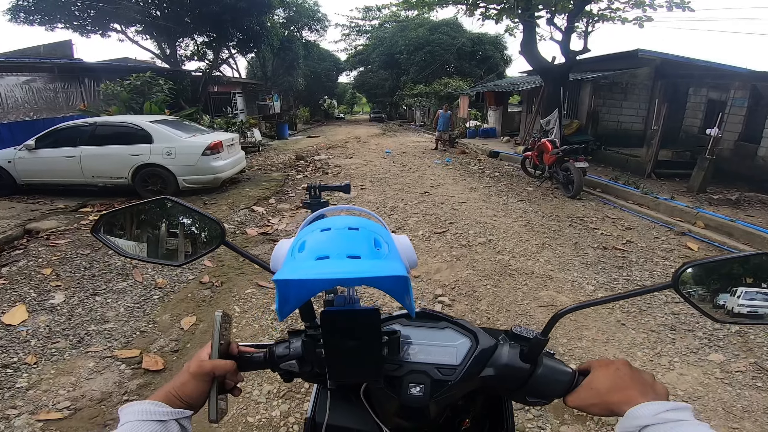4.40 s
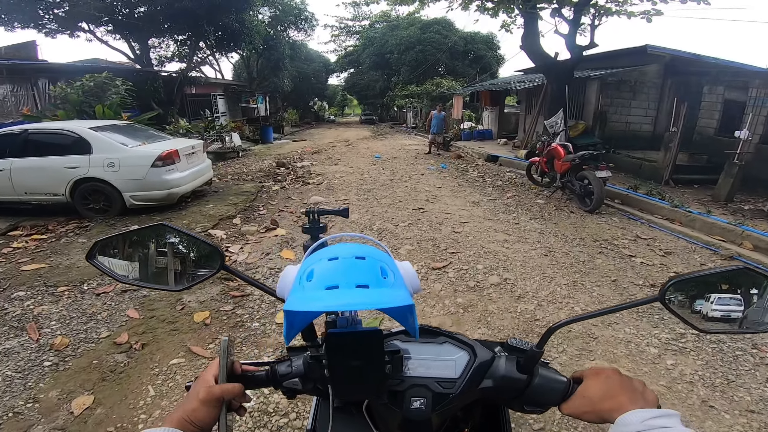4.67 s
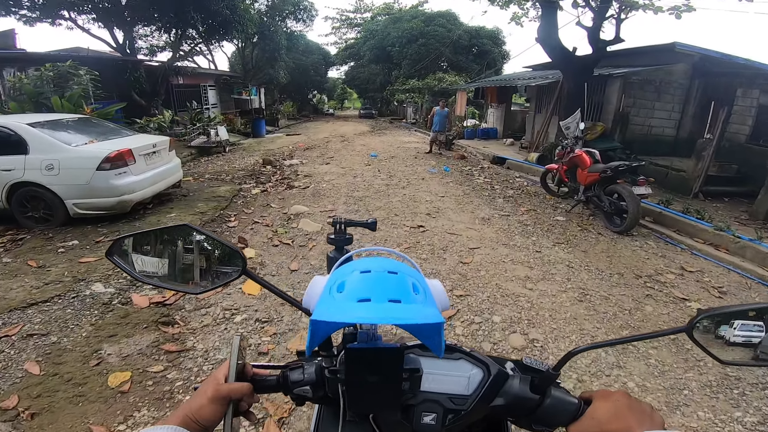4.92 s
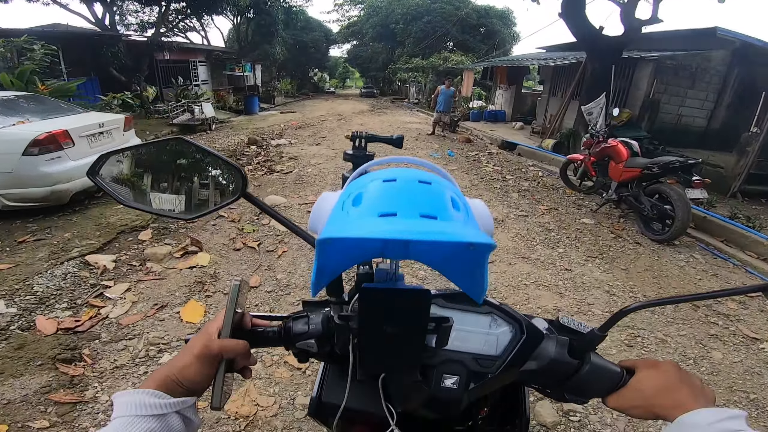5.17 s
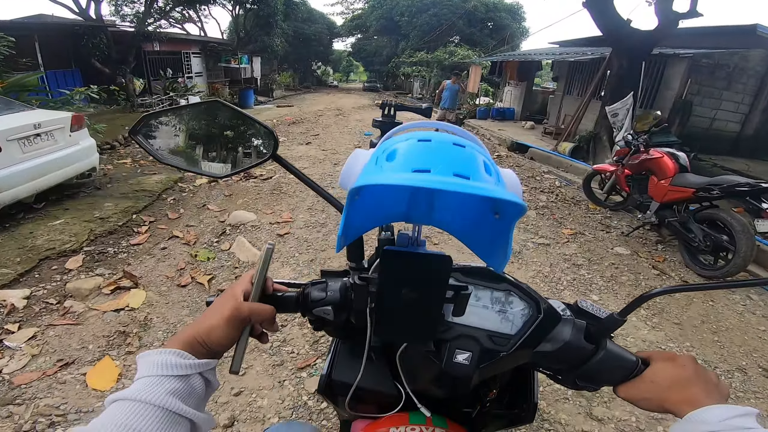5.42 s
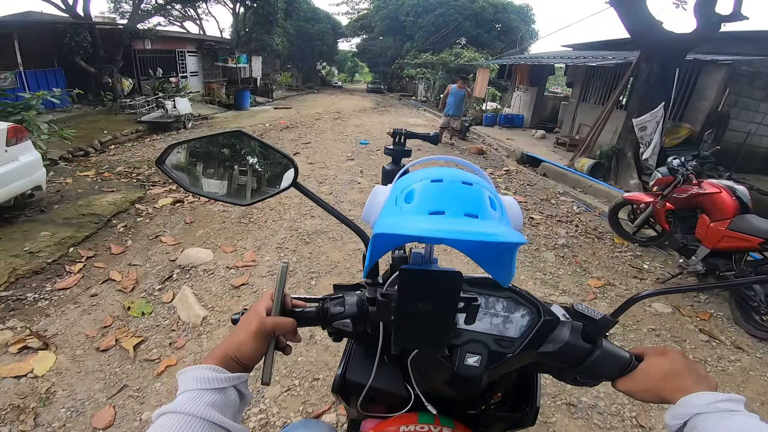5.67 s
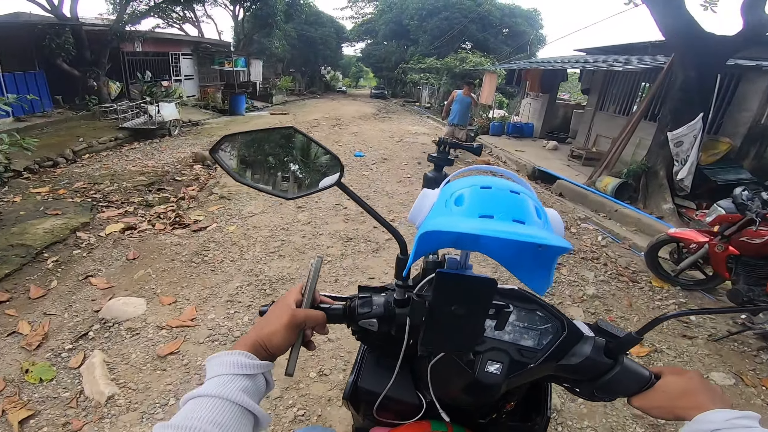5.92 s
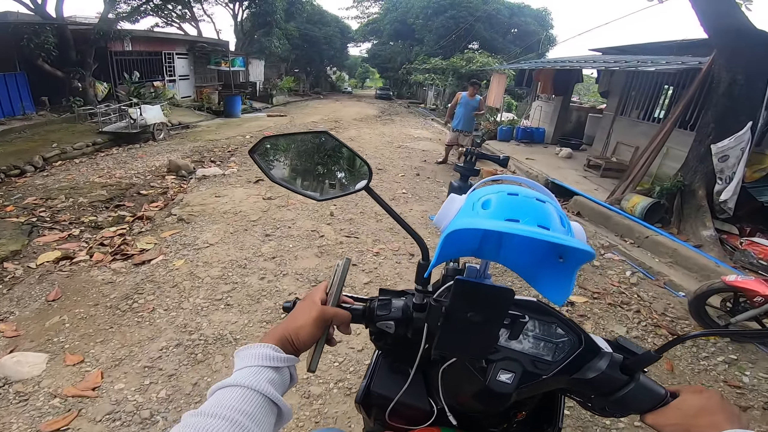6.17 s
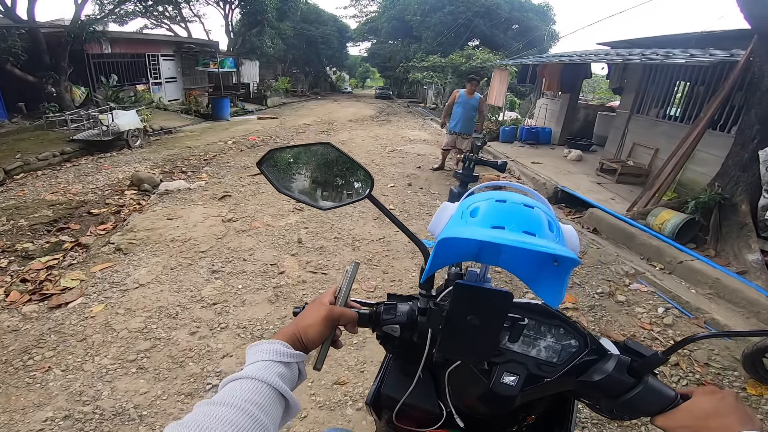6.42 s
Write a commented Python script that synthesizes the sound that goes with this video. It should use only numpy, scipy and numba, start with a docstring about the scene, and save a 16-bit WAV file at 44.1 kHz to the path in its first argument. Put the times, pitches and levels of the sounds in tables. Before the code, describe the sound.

A single-cylinder scooter idles throughout, close and muffled, as if through a sealed case on the rider's chest. Deep soft exhaust thumps come about thirteen times a second, unevenly strong, over a dull whirr, very faint hiss and low fluttering wind. At 0.15-0.4 s the case is bumped and a strap drags; at 0.55-0.9 s a tighter cluster of thuds, clicks and faint bright clinks follows. From 1 to 3.3 s only isolated knocks sound, with cloth rubbing and soft brushes near 1.9 and 2.8 s. At 3.4-3.7 s comes the densest flurry of hollow knocks, scraping and metal ticks, with a second heavy group at 4.0-4.1 s. Scattered light taps and short drags continue from 4.5 to 5.8 s, including a firmer knock at 5.3 s. From about 6.1 s the engine thumps grow fuller, a few doubled, and wind rises slightly.

```python
"""A single-cylinder scooter ticks over, heard from a sealed case on the rider's chest.
All through, each firing thumps the exhaust, strong or weak, over a whirr of noise and rumbling wind.
Knocks, rubbing straps and faint metal clinks cluster early; calmer seconds follow, with soft brushes of
cloth. The densest knocking comes at about 3.4 to 4.1 s, with more scattered knocks and drags after it.
Near the end the firings grow stronger, and a few get a short second thump."""
import sys
import numpy as np
from scipy import signal
from scipy.fft import rfft, irfft
from scipy.io import wavfile
from scipy.ndimage import uniform_filter1d
from numba import njit

SR = 44100
rng = np.random.default_rng(int(sys.argv[2]) if len(sys.argv) > 2 else 0)


def wrap_up_sound(samples):
    """Save the sound to the file named by the first command line argument, as 16-bit audio."""
    columns = np.atleast_2d(samples).T
    # keep every value between -1 and 1, then stretch to whole-number steps
    tamed = np.clip(columns, -1, 1)
    steps = np.round(tamed * 32767).astype(np.int16)
    wavfile.write(sys.argv[1], SR, steps)


def convert_level_to_amplitude(level_db):
    """Map a level in decibels to its linear amplitude factor."""
    exponent = np.asarray(level_db, float) / 20
    return 10 ** exponent


N = 288880
TIME = np.arange(N) / SR

# the four resonances of the sealed case, low to high: pitch_hz [Hz], width_hz [Hz]
CASE = [(220, 238), (460, 277), (1050, 590), (2700, 750)]


@njit
def svf(x, hz, width):
    """State-variable band-pass: two linked integrators let one pitch through, gain 1 at the centre."""
    y = np.empty(len(x))
    b, l = 0., 0.
    g, k = np.tan(np.pi * hz / SR), width / hz
    for i in range(len(x)):
        v = (b + g * (x[i] - l)) / (1 + g * (g + k))
        b = 2 * v - b
        l = l + 2 * g * v
        y[i] = k * v
    return y


def resonate(x, hz, width):
    """Two equal band-passes in a row make a steeper resonance."""
    x = x + 1e-18  # keeps the filter from working on exact zeros
    return svf(svf(x, 1. * hz, 1. * width), 1. * hz, 1. * width)


def unit(x):
    """Scale to rms 1."""
    return x / np.sqrt(np.mean(x ** 2))


def walk(rate):
    """Random levels, rate new ones a second, smoothed twice so they drift; rms 1."""
    k = int(SR / rate)
    steps = np.repeat(rng.standard_normal(N // k + 1), k)
    smooth = uniform_filter1d(uniform_filter1d(steps, k), k)
    return unit(smooth[:N])


def colour(x, points):
    """Weight the spectrum of x by a curve through (Hz, dB) points; rms 1."""
    hz, db = np.transpose(points)
    log_hz = np.log(np.fft.rfftfreq(N, 1 / SR) + 1)
    gain_db = np.interp(log_hz, np.log(hz), db, left=-90, right=-120)
    return unit(irfft(rfft(x) * convert_level_to_amplitude(gain_db), N))


def decays(times, db, t60):
    """An envelope that jumps at each time and dies away by 60 dB in t60 seconds."""
    jumps = np.zeros(N)
    np.add.at(jumps, np.clip((times * SR).astype(int), 0, N - 1), convert_level_to_amplitude(db))
    return signal.lfilter([1], [1, -np.exp(-np.log(1000) / (t60 * SR))], jumps)


def crackle(rate, spread_db, t60):
    """Noise whose level jumps at random small contacts, rate of them a second, a few large."""
    chance = rng.random((int(rate * N / SR), 2))
    times = chance[:, 0] * N / SR
    size_db = -spread_db * np.log(1 - chance[:, 1])
    return unit(decays(times, size_db, t60)) * rng.standard_normal(N)


def swell(peak_s, length_s):
    """A smooth bell-shaped rise and fall around peak_s."""
    return np.exp(-(2 * (TIME - peak_s) / length_s) ** 2)


def exhaust():
    """Each firing blows gas into the pipe, which rings at a few pitches while the gas jet swirls."""
    # engine speed: time_s [s], firing_rate_hz [Hz]
    idle = [(0.0, 13.618), (0.47, 12.904), (0.94, 13.05), (1.4, 12.913), (1.87, 12.822), (2.34, 13.064),
            (2.81, 12.7), (3.28, 12.974), (3.74, 12.467), (4.21, 13.139), (4.68, 12.862), (5.15, 13.368),
            (5.61, 12.468), (6.08, 13.463), (6.55, 13.228)]
    # throttle: time_s [s], full_firing_db [dB]
    charge = [(0.0, -14.5), (0.5, -22), (1.3, -16.5), (2.0, -20), (3.0, -19.5), (3.8, -17.5), (4.2, -17.5),
              (4.9, -20), (5.6, -17), (5.85, -20.5), (6.25, -11), (6.55, -13)]
    # uneven firings: time_s [s], shortfall_db [dB under a full firing; below 0 is a rich one]
    weak = [(0.22, 10), (0.295, -3), (0.37, 3.5), (0.53, -1.5), (0.6, 0), (0.68, -2), (0.76, -0.5),
            (0.83, 1.5), (0.99, 9), (1.14, 9), (1.22, -2), (1.37, 3.5), (1.45, 8), (1.6, 7), (1.68, 5.5),
            (1.76, 17), (1.91, 7), (2.0, -1), (2.07, 2.5), (2.15, -2.5), (2.38, 18), (2.53, 6), (2.69, 5),
            (3.31, 12), (3.62, 1), (3.78, 11), (3.94, 20), (4.02, 16), (4.1, 3.5), (4.18, -2), (4.25, 9),
            (4.33, -2), (4.4, 3.5), (4.48, 4.5), (4.79, 3.5), (4.94, 8), (5.09, 2), (5.17, -1.5),
            (5.24, -0.5), (5.56, 6.5), (5.95, -2.5), (6.02, -3), (6.1, -2), (6.17, 2), (6.32, 13),
            (6.47, 6.5)]
    # ringing of the pipe: pitch_hz [Hz], level_db [dB], t60_s [s]
    pipe_modes = [(44.9, -12.5, .4), (67.9, -1.0, .115), (116.3, 0.0, .174)]
    # second thumps of weak charges that burn on late: time_s [s], level_db [dB]
    late_burns = [(5.885, -17), (6.337, -14), (6.487, -13)]
    # sound of the gas jet: pitch_hz [Hz], level_db [dB per Hz]
    puff = [(20, -11.5), (45, -13), (90, -0.5), (140, -0.5), (220, -13), (400, -25.5)]
    lead = 4096  # samples run before 0 s, so that the pipe already rings
    start_phase = .118  # share of a firing cycle gone at 0 s
    push_s, late_fade_s = .0093, .028  # blow-down of the exhaust valve; fade of a late thump

    t = np.arange(-lead, N) / SR
    phase = np.cumsum(np.interp(t, *np.transpose(idle))) / SR
    phase = phase - phase[lead] + start_phase
    count = np.arange(np.ceil(phase[0]), phase[-1])  # a firing at each whole cycle
    when = np.interp(count, phase, t)
    full_db = np.interp(when, *np.transpose(charge))
    short_db = np.zeros(len(when))
    for s, drop_db in weak:
        short_db[np.argmin(abs(when - s))] = drop_db
    jitter, unevenness = rng.standard_normal((2, len(when)))
    when = when - .0004 * short_db + 0.00048 * jitter  # weak firings come early
    places = np.clip((when * SR).astype(int) + lead, 0, N + lead - 1)
    fires = np.zeros(N + lead)
    fires[places] = convert_level_to_amplitude(full_db - short_db + 0.56 * unevenness)

    v = np.arange(SR // 2) / SR
    ring = np.zeros(len(v))
    for k, (hz, db, t60) in enumerate(pipe_modes):
        sign = (-1) ** k  # neighbouring pipe modes leave the mouth with opposite sign
        ring += sign * convert_level_to_amplitude(db) * np.sin(2 * np.pi * hz * v) * 1000. ** (-v / t60)
    push = np.sin(np.pi * np.clip(v / push_s, 0, 1)) ** 2
    thump = signal.fftconvolve(push, ring)[:len(v)]
    tone = signal.fftconvolve(fires, thump / thump.max())[lead:lead + N]

    late_s, late_db = np.transpose(late_burns)
    late = np.zeros(N)
    late[(late_s * SR).astype(int)] = convert_level_to_amplitude(late_db)
    short_thump = thump * np.exp(-(v / late_fade_s) ** 2)
    tone = tone + signal.fftconvolve(late, short_thump / short_thump.max())[:N]

    # the jet swirls for a moment after each firing, never twice alike
    jet_shape = (v / 0.012) * np.exp(1 - v / 0.014)
    jet = signal.fftconvolve(fires, jet_shape)[lead:lead + N]
    return tone + convert_level_to_amplitude(-22) * jet * colour(rng.standard_normal(N), puff)


def whirr(db):
    """Fan, belt and valve gear: flickering noise with small ticks in it."""
    # pitch_hz [Hz], level_db [dB per Hz]
    whirr_colour = [(210, -37), (350, -17.5), (457, -4.5), (760, -7.5), (1280, -9.5), (1440, -10.5),
                    (3000, -14.5), (4470, -27.5), (4940, -34), (6420, -61.5), (10900, -120)]
    air = convert_level_to_amplitude(1.2 * walk(20)) * rng.standard_normal(N)
    ticks = crackle(120, 2.0, 0.015)
    return convert_level_to_amplitude(db) * colour(air + convert_level_to_amplitude(-8.0) * ticks, whirr_colour)


def hiss(db):
    """The thin treble that gets through the case: noise with a flickering level."""
    # pitch_hz [Hz], level_db [dB per Hz]
    hiss_colour = [(4500, -26.5), (5600, 5.5), (6500, -1.5), (7600, 4.5), (8400, -5), (9600, -13),
                   (11000, -44), (12500, -22.5), (13800, -14.5), (15500, -32)]
    return convert_level_to_amplitude(db + 1.4 * walk(23)) * colour(rng.standard_normal(N), hiss_colour)


def whines():
    """Faint thin whines: narrow strips of noise that swell and fade."""
    # peak_s [s], length_s [s], pitch_hz [Hz], width_hz [Hz], level_db [dB]
    whine_list = [(0.72, .15, 4600, 40, -75), (1.55, .2, 4615, 35, -76), (1.78, .1, 4520, 120, -73),
                  (2.8, .15, 3470, 90, -63), (2.8, .14, 5040, 120, -76), (2.86, .07, 3710, 40, -64),
                  (2.97, .2, 4340, 35, -76), (4.42, .2, 4590, 40, -76), (4.47, .35, 4340, 40, -76)]
    noise = rng.standard_normal(N)
    out = np.zeros(N)
    for peak_s, length_s, hz, width, db in whine_list:
        out += convert_level_to_amplitude(db) * swell(peak_s, length_s) * unit(resonate(noise, hz, width))
    return out


def knocks():
    """Each knock is a blow and a short scrape that sound the case's four resonances in its own mix."""
    # heavy knocks thud, hard ones tap and click: start_s [s], level_db [dB],
    # thud_db [dB over level], tap_db [dB over level], click_db [dB over tap]
    knock_list = [(0.167, -20, 4.5, -14, -11), (0.173, -21, -9, -6.5, -6.5), (0.196, -28, -1, -20, -13),
                  (0.253, -30.5, -11, 0, -19), (0.27, -35, -6, -16, -12), (0.355, -37, -7, 1, -16),
                  (0.368, -35, -8, 3, -18), (0.38, -30.5, -13, 1, -17), (0.387, -36, -11, 2.5, -20),
                  (0.401, -35, -5, 0, -16), (0.56, -24, -1, -8, -14), (0.588, -27, -5, -3, -9),
                  (0.594, -16.5, -3, -17, -13), (0.606, -28, -3, -9, -11), (0.614, -33, -5, -4, 3),
                  (0.623, -30, -11, -8, 4), (0.626, -14, 3.5, -6, -20), (0.634, -30, 8, -26, -8),
                  (0.64, -26.5, 12, -12, 5), (0.652, -31, -3, -6, -8), (0.658, -24, -1, -6.5, 3),
                  (0.666, -25.5, 6, -12, -9), (0.684, -24, 9.5, -16, -11), (0.7, -35.5, -10, -4, 4),
                  (0.753, -21, 1.5, -22, -7), (0.877, -24.5, 9.5, -22, -8), (0.888, -23.5, -2, -22, -10),
                  (1.082, -22, 6, -27, -12), (1.087, -15, -0.5, -22, -16), (1.095, -25.5, 3, -22, -10),
                  (1.226, -27, 3, -2, -11), (1.273, -33, 5, -2, -2), (1.296, -25, -14, -2.5, -16),
                  (1.593, -22.5, 6, -27, -15), (1.838, -22.5, 9, -7.5, -15), (1.916, -25.5, 0, -3.5, -9),
                  (2.039, -22, -10, -8, -14), (2.05, -28.5, -7, -2, -4.5), (2.329, -15, -9, -13, -13),
                  (2.337, -21.5, 0, -23, -8), (2.443, -22.5, -9, -7, -10.5), (2.496, -14.5, 2, -19, -9),
                  (2.674, -32, -4, 7, -6), (2.694, -16.5, -8, -10.5, -15), (3.071, -31, 12.5, -4, -4),
                  (3.239, -28, 11.5, -24, -13), (3.314, -14, -20, -26, -12), (3.412, -9, -4, -18, -19),
                  (3.425, -20, -3, -14, -11), (3.435, -21, 1, -11, -5.5), (3.445, -13, -10.5, -22, -2),
                  (3.464, -25, -1, -6, -14), (3.484, -9, -10, -22, -15), (3.499, -31, 7, -7, -14),
                  (3.517, -21, 0, -17, -12), (3.526, -10.5, -2, -25, -12), (3.54, -25, 5, -13, -6),
                  (3.549, -27, -2, -10, 7), (3.566, -13, -10, -7.5, -12), (3.578, -18.5, 8, -9, -2),
                  (3.592, -20.5, 0, -5.5, -8), (3.612, -14.5, -5, -19, 3), (3.619, -20, 5, -16, -5),
                  (3.63, -18, -11, -16, -9), (3.64, -29, -2, -11, -8), (3.65, -28.5, -9, 0, -12),
                  (3.667, -18.5, 0, -4.5, -14), (3.679, -22, 4, -5, -15), (3.689, -30, 2, -1, -21),
                  (3.978, -26, -1, -14, -10), (3.997, -18.5, 5, -9, -9), (4.007, -30, 7, -16, -4),
                  (4.018, -25, -10, -16, -1), (4.037, -12.5, 2, -21, -12), (4.047, -22, 3, -17, -8),
                  (4.069, -27, 0, -17, 2), (4.08, -26, 3, -16, -2), (4.089, -27, -10, -21, -1),
                  (4.157, -30, -9, -4, -1.5), (4.166, -24, -18, -4.5, -1.5), (4.362, -21, -23, -17, -10),
                  (4.528, -31, -8, -2, -16), (4.572, -29.5, -8, -3, -7), (4.607, -33, -9, -1, 3),
                  (4.635, -26, -12, -8, -10), (4.664, -27, -12, -12, -8), (4.69, -33, -8, -4, -6),
                  (4.645, -36, -18, 0, 0), (4.876, -26.5, -2.5, -5.5, -3.5), (4.9, -37, -10, 3, -6),
                  (4.964, -24, 0.5, -10, -8), (5.042, -29, -7, 1, -13), (5.067, -33.5, -6, -2, -17),
                  (5.115, -27, -3, -9, -12), (5.158, -24, -8, -10, -17), (5.172, -25.5, -2, -9, -14),
                  (5.262, -32, -7, 1, -14), (5.283, -37, -8, -2, -8), (5.304, -14.5, -8, -16, -15),
                  (5.311, -19.5, -7, -14, -15), (5.451, -27, -21, -5.5, -3.5), (5.485, -21, -16, -23, -13),
                  (5.507, -31, -14, 2, -11), (5.657, -30.5, 10.5, 0.5, -9.5), (5.718, -33, -4, 3.5, -24),
                  (5.767, -20, 9, -35, -12), (5.774, -18.5, -11, -30, -12), (5.781, -25, 7.5, -30, -11),
                  (5.925, -38, -5, 2, -14), (5.938, -32.5, -2, 8, -11), (5.945, -35, 5, 7, -9),
                  (5.952, -38.5, -2, 1.5, 1), (6.393, -32, 8, -11, -14), (6.452, -34.5, -5, 1.5, -3)]
    # level on each of the four resonances [dB]: of the blow, and of the scrape after it
    blow_mix_db = [5.5, 7, 6, 3.5]
    scrape_mix_db = [-5, -5, -6, -4]
    detune = .13  # each blow lands on another spot and shifts the pitch by about this share
    push_cycles = .25  # a blow builds up over this share of a ring cycle
    scrape_t60_s = 0.038

    s, level_db, thud_db, tap_db, click_db = np.transpose(knock_list)
    body_db = np.full(len(s), -8.0)
    mix = convert_level_to_amplitude(level_db + np.array([thud_db, body_db, tap_db, tap_db + click_db]))
    v = TIME[:4096]
    hz, width = np.transpose(CASE)[:, :, None]
    spot = 1 + detune * rng.standard_normal((len(s), len(CASE), 1))
    scrape_shape = (1 - np.exp(-v / 0.0011)) * 1000. ** (-v / scrape_t60_s)
    blows, scrape_levels = np.zeros((2, len(CASE), N + len(v)))
    for k, start in enumerate((s * SR).astype(int)):
        cycles = hz * spot[k] * v
        build_up = 1 - np.exp(-(cycles / push_cycles) ** 2)
        ring = np.sin(2 * np.pi * cycles) * build_up * np.exp(-1.6 * width * v)
        blows[:, start:start + len(v)] += mix[:, [k]] * ring
        scrape_levels[:, start:start + len(v)] += mix[:, [k]] * scrape_shape

    noise = crackle(1500, 1.3, 0.0072)  # a scrape is a string of tiny catches
    out = np.zeros(N)
    for k, (f, w) in enumerate(CASE):
        through = resonate(noise, f, w).std()  # evens out what each resonance lets pass
        scrape = resonate(noise * scrape_levels[k, :N], f, w) / through
        out += convert_level_to_amplitude(scrape_mix_db[k]) * scrape + convert_level_to_amplitude(blow_mix_db[k]) * blows[k, :N]
    return out


def drags():
    """A strap drags over the case: coarse catches in quick succession sound its four resonances."""
    # start_s [s], length_s [s], level_db [dB], edge_db [dB lift of the two upper resonances]
    drag_list = [(0.153, 0.047, -40, 1), (0.34, 0.066, -41, 7), (0.598, 0.12, -40, 4.5),
                 (2.662, 0.077, -49, 10), (3.411, 0.29, -38, 2), (3.987, 0.12, -37.5, -7),
                 (4.56, 0.14, -41.5, 3), (4.865, 0.065, -43.5, 9), (4.987, 0.16, -40.5, 1.5),
                 (5.33, 0.079, -57.5, 14.5), (5.716, 0.083, -40.5, -2)]
    # level on each of the four resonances [dB]
    drag_mix_db = [-2.5, 0, -7, -20.5]
    catches = crackle(140, 1.6, 0.02)
    rasp = [convert_level_to_amplitude(db) * unit(resonate(catches, hz, 0.79 * width))
            for (hz, width), db in zip(CASE, drag_mix_db)]
    body, edge = rasp[0] + rasp[1], rasp[2] + rasp[3]
    out = np.zeros(N)
    for s, length, db, edge_db in drag_list:
        fade_in = (TIME - s) / .014
        fade_out = (s + length - TIME) / 0.012
        shape = np.clip(np.minimum(fade_in, fade_out), 0, 1)
        out += convert_level_to_amplitude(db) * shape * (body + convert_level_to_amplitude(edge_db) * edge)
    return out


def bumps():
    """The chest bumps the whole case: a dull thud of two low swings that rise and die."""
    # start_s [s], pitch_hz [Hz], level_db [dB]
    bump_list = [(0.158, 109, -18), (0.188, 103.4, -12), (0.627, 150, -18), (0.681, 104.6, -16.5),
                 (3.995, 166, -17.5), (4.031, 108.6, -28), (4.054, 152, -17), (4.065, 124, -17)]
    swings = 2
    out = np.zeros(N)
    for s, hz, db in bump_list:
        cycles = np.clip((TIME - s) * hz, 0, swings)
        out -= convert_level_to_amplitude(db) * np.sin(2 * np.pi * cycles) * np.sin(np.pi * cycles / swings)
    return out


def rubbing(db):
    """Cloth slips over the case in many small, unequal grabs."""
    # pitch_hz [Hz], level_db [dB per Hz]
    rub_colour = [(71, -34), (120, -5), (172, 1), (409, -5), (538, -9), (747, -21), (1190, -29),
                  (1500, -35), (1950, -46.5), (3300, -120)]
    return convert_level_to_amplitude(db) * colour(crackle(400, 2.4, 0.079), rub_colour)


def scuffing(db):
    """A strap scuffs the wall and sounds its third resonance, with a flicker and a slower swell."""
    level = convert_level_to_amplitude(db + 1.3 * walk(25) + 1.0 * walk(6.5))
    return level * unit(resonate(crackle(400, 3.5, 0.05), *CASE[2]))


def brushes():
    """Cloth brushes past: soft hissy swells made of fine crackle."""
    # peak_s [s], length_s [s], level_db [dB]
    brush_list = [(0.797, 0.16, -63), (1.28, 0.066, -68.5), (1.917, .08, -67), (2.802, 0.14, -64.5),
                  (3.1, 0.22, -74.5), (3.62, 0.51, -65.5)]
    # pitch_hz [Hz], level_db [dB per Hz]
    brush_colour = [(2800, -13), (3600, 8), (4600, 10.5), (5600, 4), (6500, -5.5), (7600, 4), (8400, -5),
                    (10000, -24.5)]
    level = sum(convert_level_to_amplitude(db) * swell(peak_s, length_s) for peak_s, length_s, db in brush_list)
    return level * colour(crackle(600, 1.2, 0.02), brush_colour)


def clinks():
    """Faint bright ticks of loose metal: treble noise that starts quickly and dies away."""
    # start_s [s], level_db [dB]
    clink_list = [(0.3594, -75), (0.61, -69), (0.635, -70), (0.725, -71.5), (0.745, -72), (0.7856, -71),
                  (0.8165, -71), (1.274, -75), (2.7794, -81), (3.505, -65), (3.598, -67), (3.6117, -62.5),
                  (3.673, -62), (3.684, -65), (3.752, -68), (3.795, -69), (4.005, -79), (4.8794, -77)]
    # pitch_hz [Hz], level_db [dB per Hz]
    clink_colour = [(5000, -20), (6500, -6), (7700, 0), (9000, -5), (10500, -10), (11400, -20), (12000, -8),
                    (13500, -8), (15000, -16)]
    s, level_db = np.transpose(clink_list)
    level = uniform_filter1d(decays(s, level_db, 0.074), 200)  # softens the onset
    return level * colour(rng.standard_normal(N), clink_colour)


def wind(db):
    """Low buffeting: rumbling noise whose level flutters."""
    # pitch_hz [Hz], level_db [dB per Hz]
    wind_colour = [(15, -7), (25, 4.5), (33, -1), (42, 1), (60, 0), (115, -2.5), (160, -6), (260, -14)]
    return convert_level_to_amplitude(db + 1.8 * walk(12)) * colour(rng.standard_normal(N), wind_colour)


def scene():
    """Engine, handling and wind, all close to one microphone."""
    # how much the rider moves against the case: time_s [s], rubbing_db [dB]
    handling_levels = [(0.03, -36), (0.59, -37.5), (0.9, -34.5), (1.33, -32.5), (1.58, -38.5), (2.4, -33.5),
                       (2.69, -36.5), (2.94, -36), (3.2, -32.5), (3.4, -32.5), (3.5, -29.5), (3.72, -37.5),
                       (4.1, -37.5), (4.87, -39.5), (5.51, -40.5), (5.8, -35), (6.25, -36), (6.52, -38)]
    # time_s [s], wind_db [dB]
    gusts = [(0.0, -16), (0.11, -35), (0.19, -22.5), (0.26, -30), (0.69, -26.5), (1.11, -30.5), (1.3, -26),
             (1.81, -30), (2.24, -29.5), (2.77, -33.5), (3.38, -27.5), (3.57, -27), (3.9, -34),
             (4.02, -31.5), (4.11, -31.5), (4.45, -31), (4.6, -28.5), (4.76, -34), (5.4, -37), (5.861, -31),
             (6.2, -29), (6.5, -28)]
    # the rider shifts and shades the engine's treble more or less: time_s [s], treble_db [dB]
    shade = [(0.0, 2), (1.0, 0.5), (2.0, 1.5), (3.0, 1), (4.3, 1.5), (5.0, 0.5), (5.7, 0), (6.55, 1)]
    case_top_hz = 4420  # the sealed wall lets little through above this

    rub_db = np.interp(TIME, *np.transpose(handling_levels))
    wind_db = np.interp(TIME, *np.transpose(gusts))
    shade_db = np.interp(TIME, *np.transpose(shade))
    stir_db = np.maximum(rub_db + 33.5, 0)  # rubbing above -33.5 dB shakes strap and panels as well

    engine = exhaust() + whirr(-45.5 + shade_db + 0.97 * stir_db)
    engine = engine + hiss(-78 + shade_db) + whines()
    muffle = signal.butter(8, case_top_hz, fs=SR, output="sos")
    wall = signal.sosfilt(muffle, knocks() + drags())
    handling = wall + bumps() + rubbing(rub_db) + scuffing(-50 + 0.93 * stir_db)
    handling = handling + brushes() + clinks()
    return (engine + handling + wind(wind_db))[None]


def roll_off(x):
    """The treble ends steeply here."""
    return signal.sosfilt(signal.butter(12, 15300, fs=SR, output="sos"), x)


def record(dry):
    """The microphone drops the deepest bass and adds a faint noise."""
    low_cut = signal.butter(1, 10, "high", fs=SR, output="sos")
    heard = signal.sosfilt(low_cut, dry)
    heard = heard + convert_level_to_amplitude(-106) * rng.standard_normal(dry.shape)
    return roll_off(heard)


dry = scene()
out = record(dry)
wrap_up_sound(out)
```